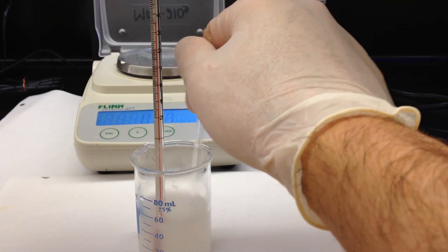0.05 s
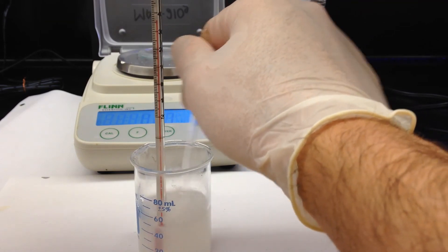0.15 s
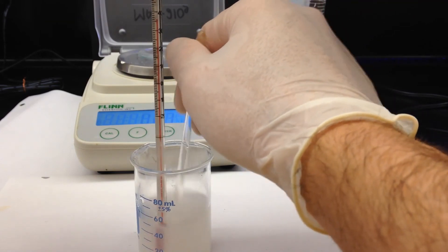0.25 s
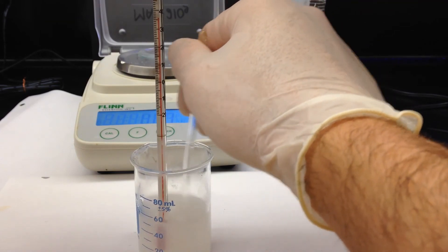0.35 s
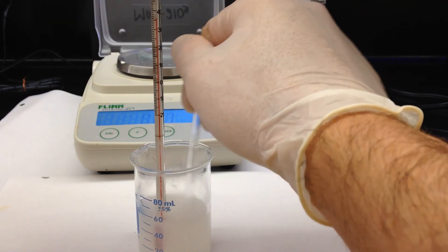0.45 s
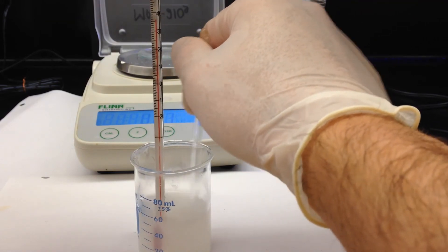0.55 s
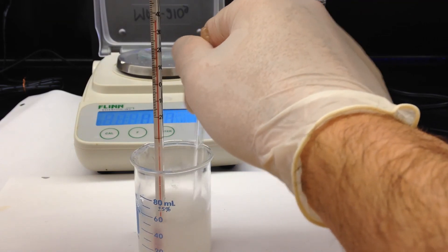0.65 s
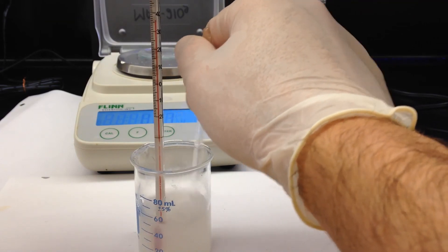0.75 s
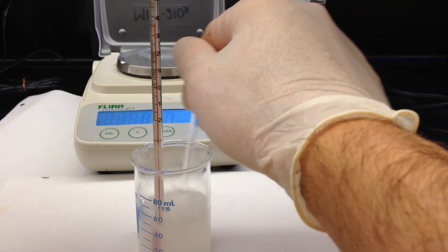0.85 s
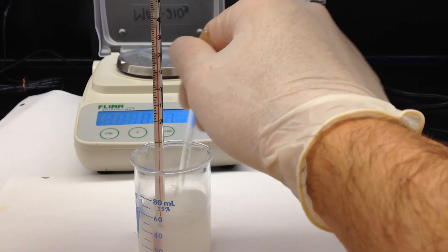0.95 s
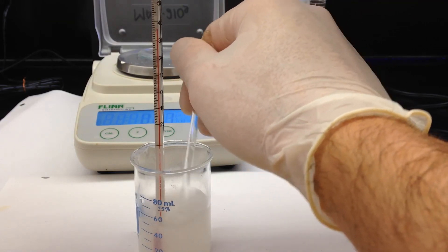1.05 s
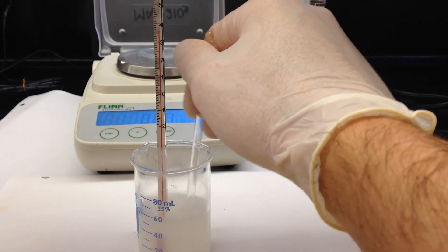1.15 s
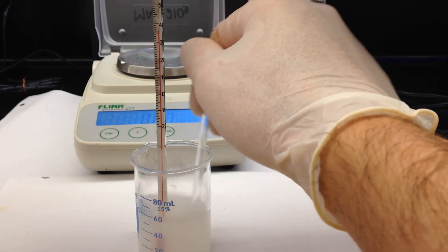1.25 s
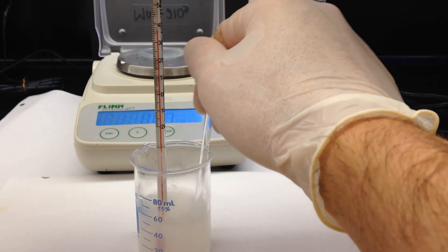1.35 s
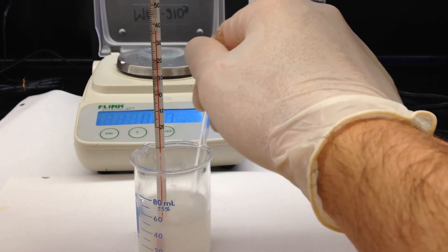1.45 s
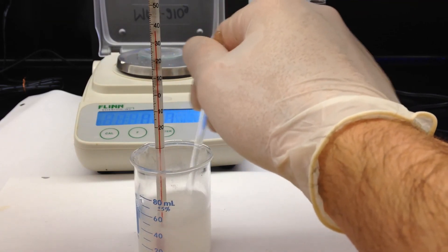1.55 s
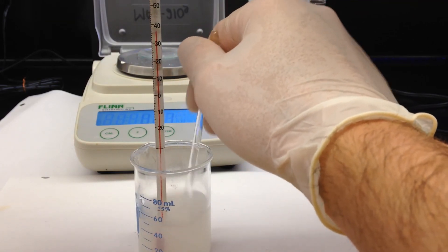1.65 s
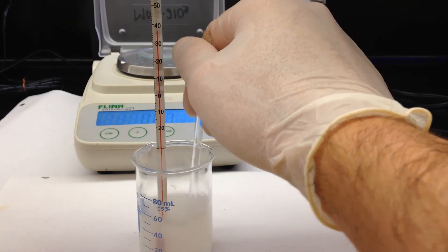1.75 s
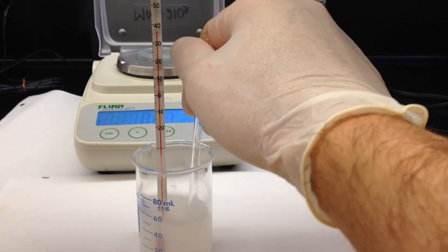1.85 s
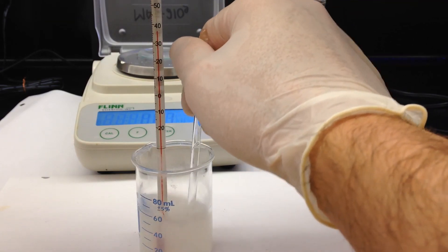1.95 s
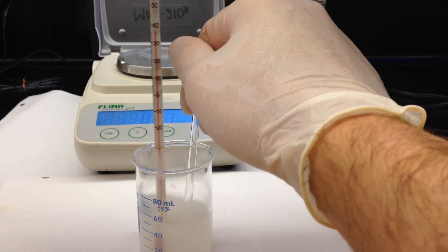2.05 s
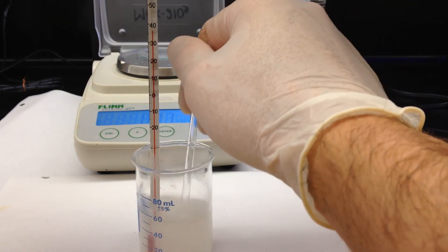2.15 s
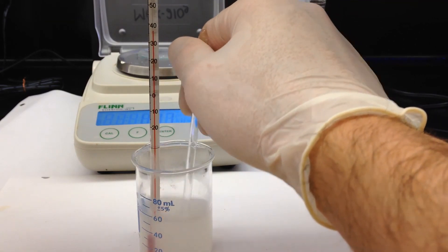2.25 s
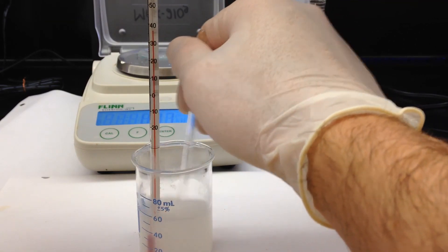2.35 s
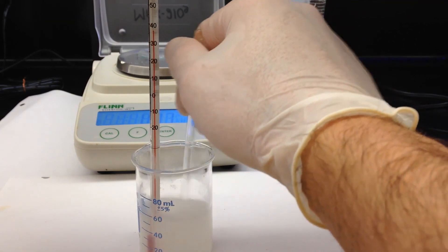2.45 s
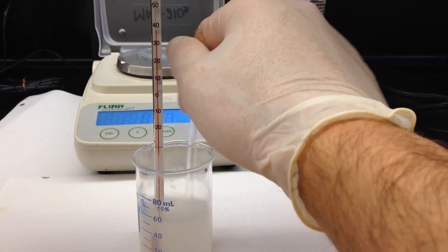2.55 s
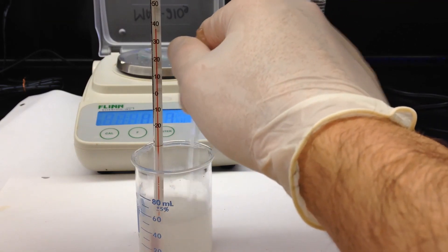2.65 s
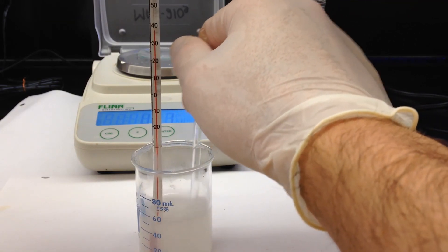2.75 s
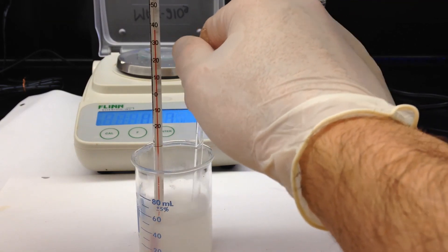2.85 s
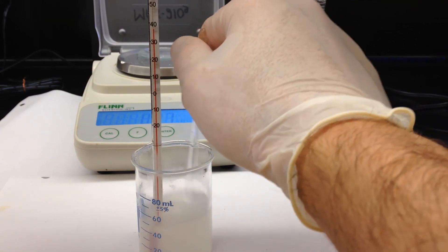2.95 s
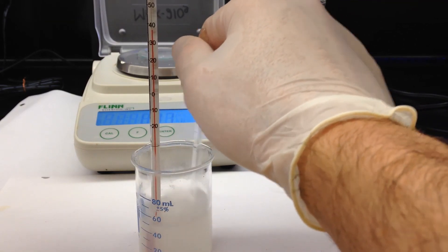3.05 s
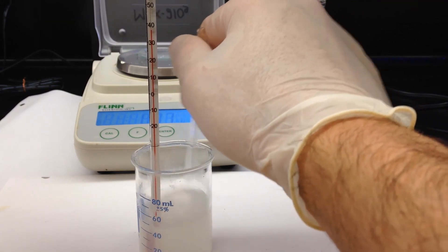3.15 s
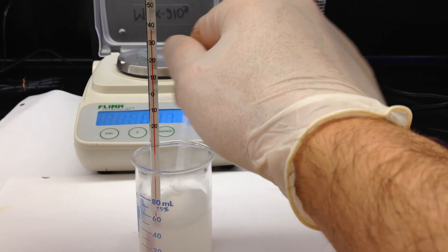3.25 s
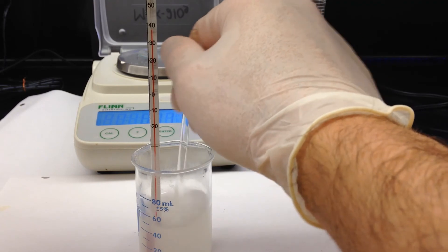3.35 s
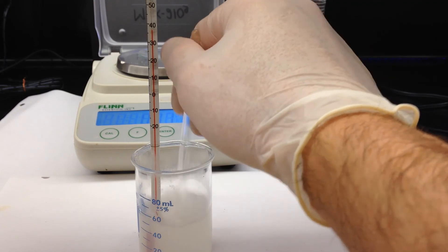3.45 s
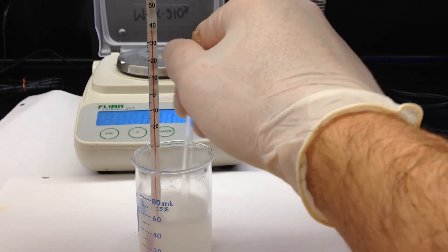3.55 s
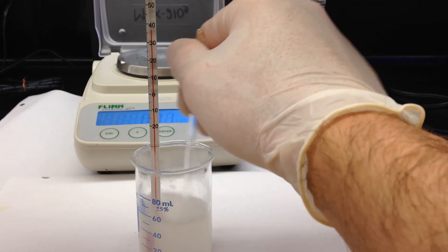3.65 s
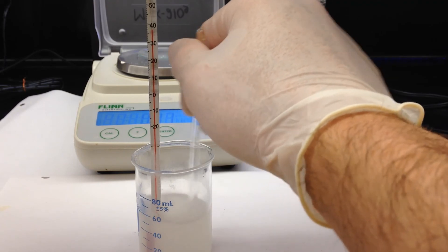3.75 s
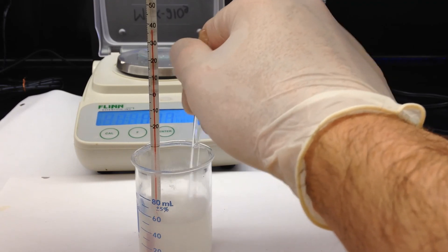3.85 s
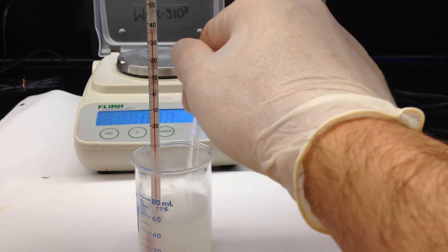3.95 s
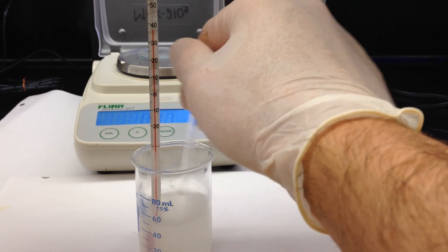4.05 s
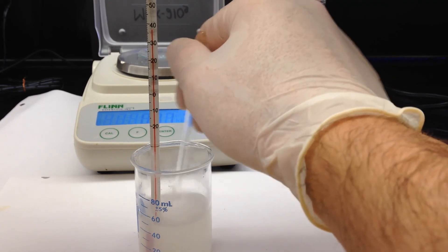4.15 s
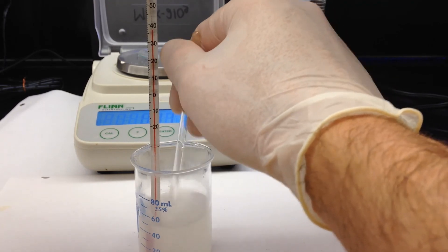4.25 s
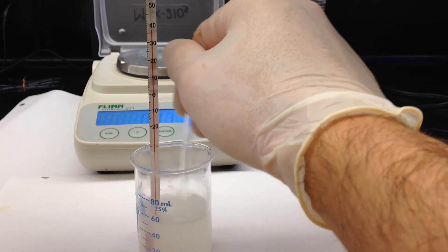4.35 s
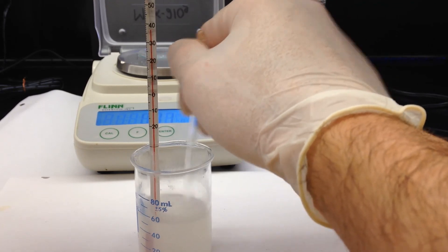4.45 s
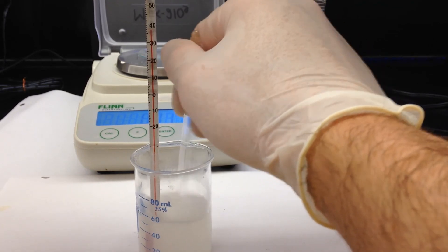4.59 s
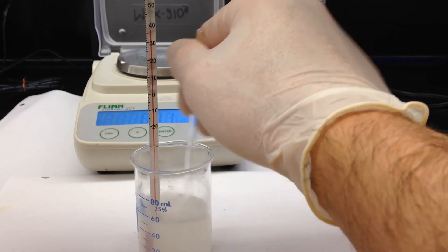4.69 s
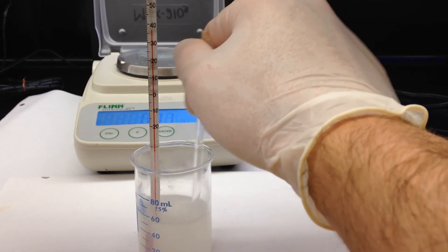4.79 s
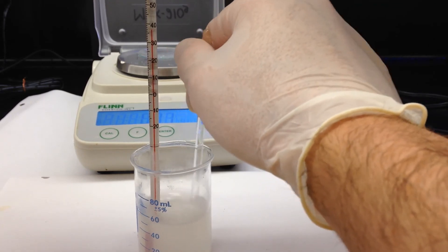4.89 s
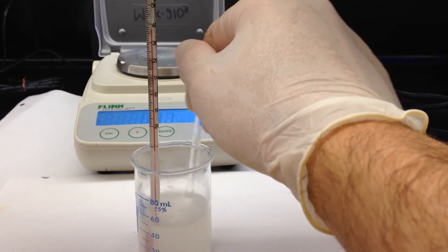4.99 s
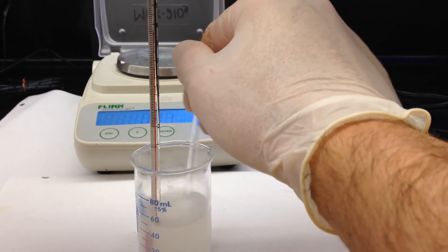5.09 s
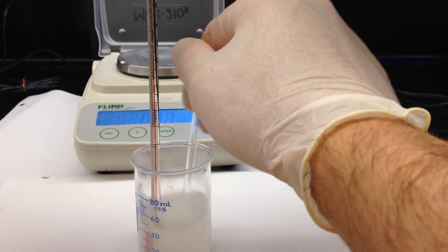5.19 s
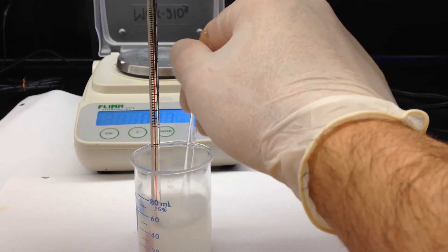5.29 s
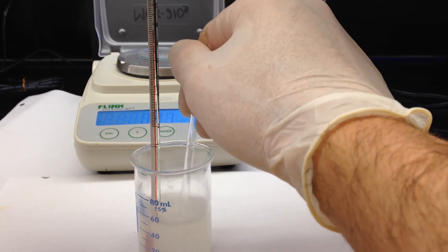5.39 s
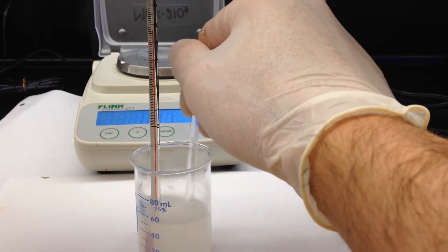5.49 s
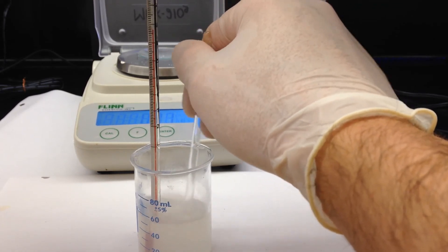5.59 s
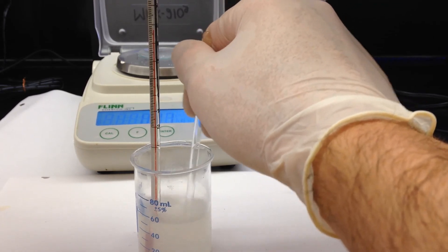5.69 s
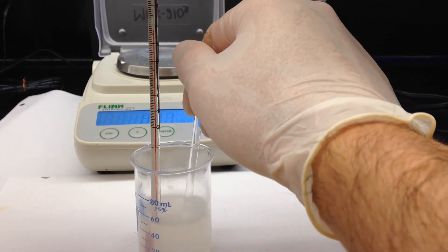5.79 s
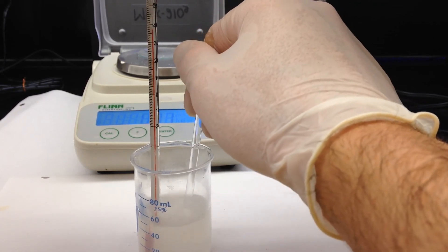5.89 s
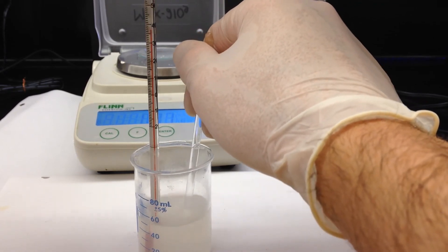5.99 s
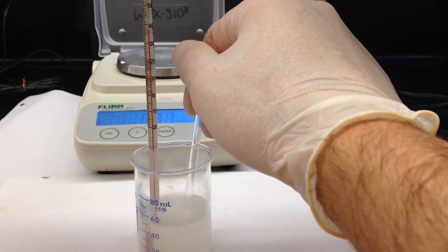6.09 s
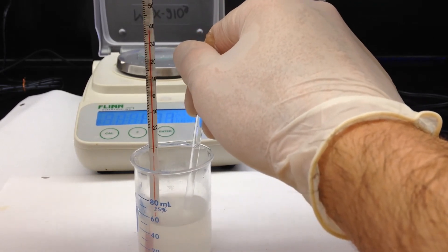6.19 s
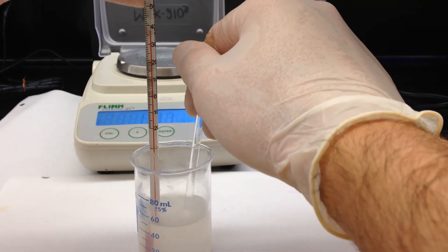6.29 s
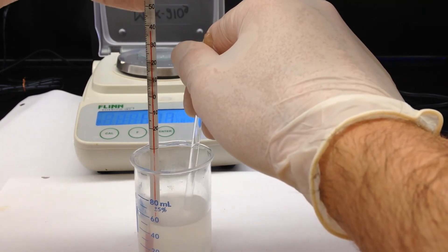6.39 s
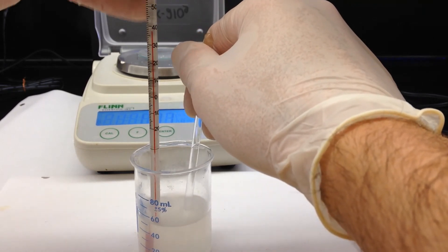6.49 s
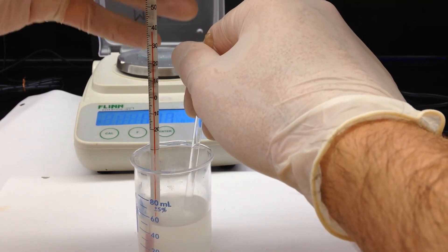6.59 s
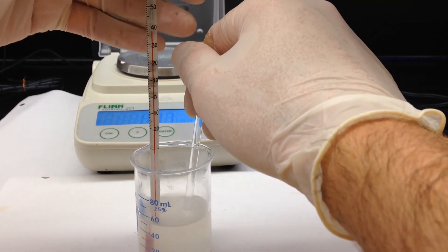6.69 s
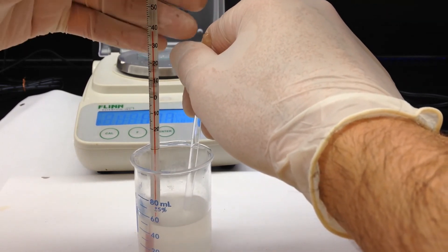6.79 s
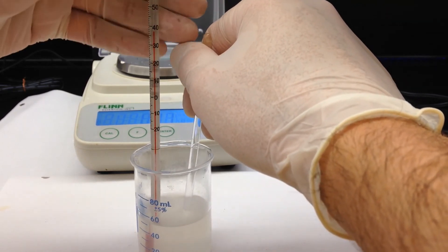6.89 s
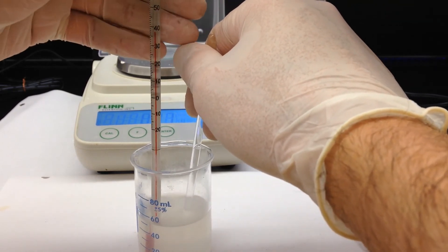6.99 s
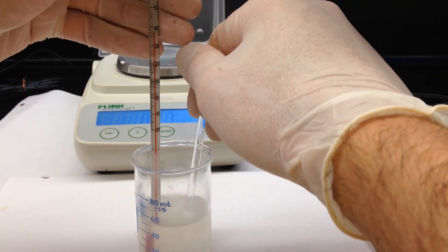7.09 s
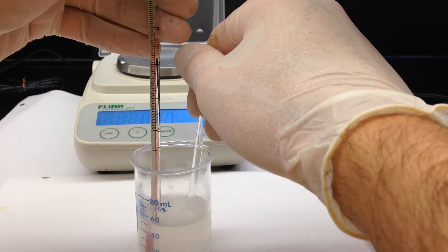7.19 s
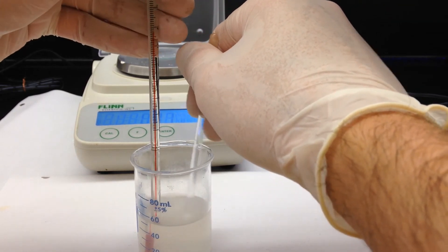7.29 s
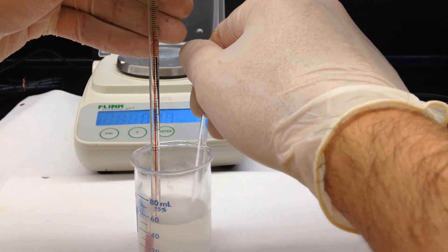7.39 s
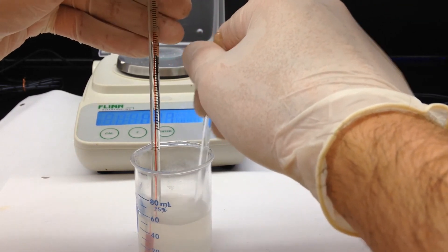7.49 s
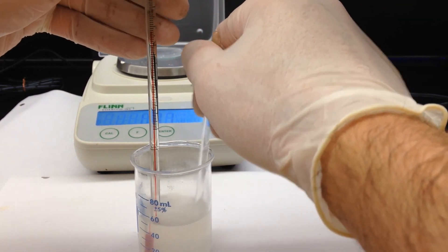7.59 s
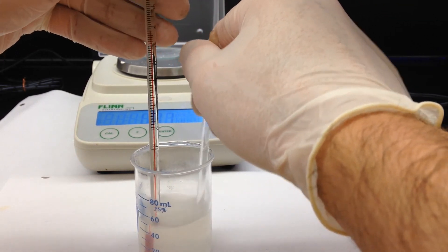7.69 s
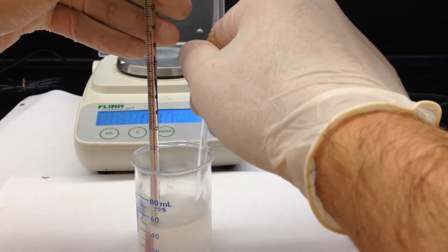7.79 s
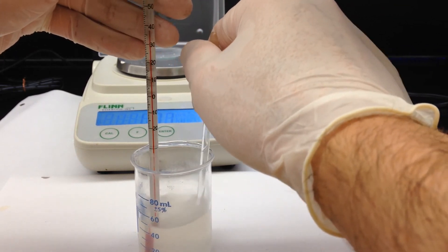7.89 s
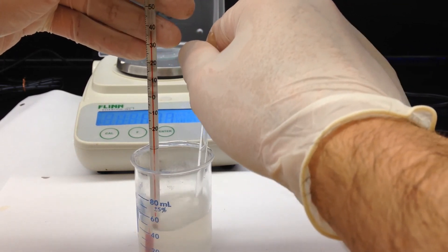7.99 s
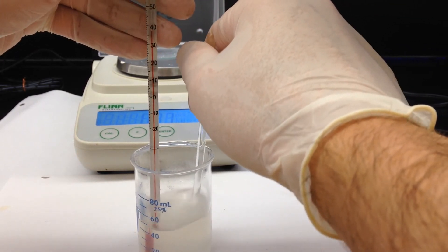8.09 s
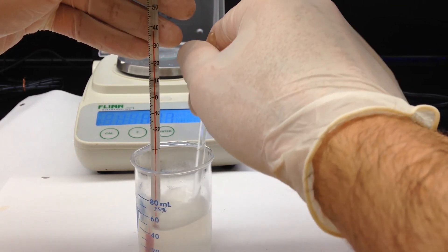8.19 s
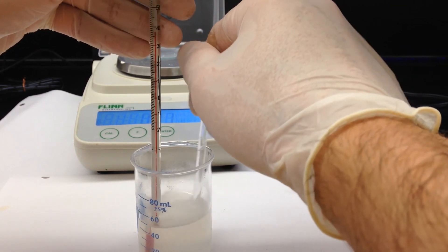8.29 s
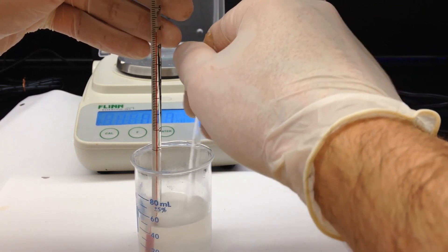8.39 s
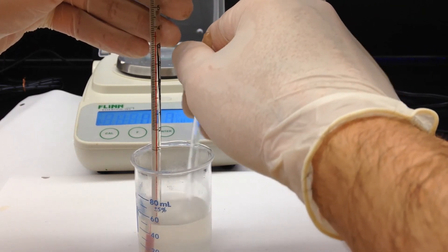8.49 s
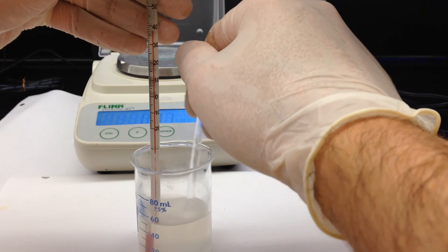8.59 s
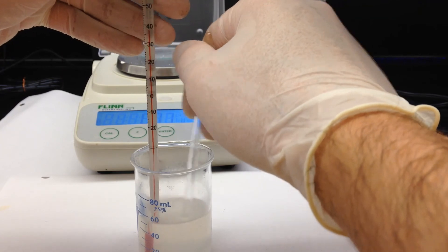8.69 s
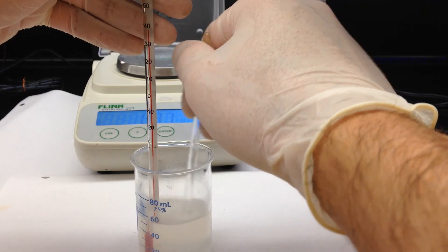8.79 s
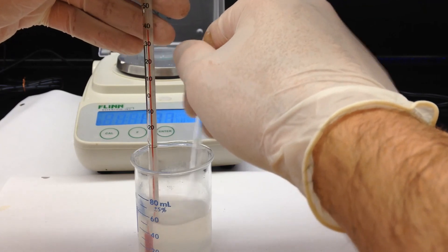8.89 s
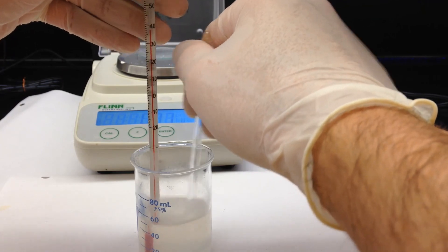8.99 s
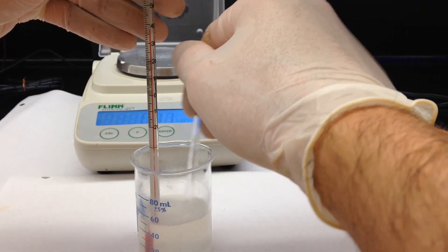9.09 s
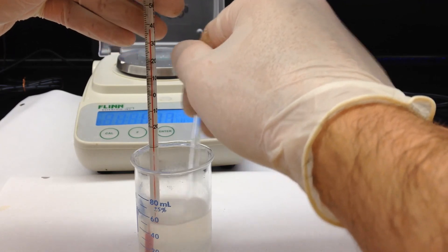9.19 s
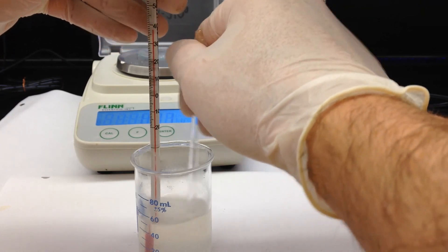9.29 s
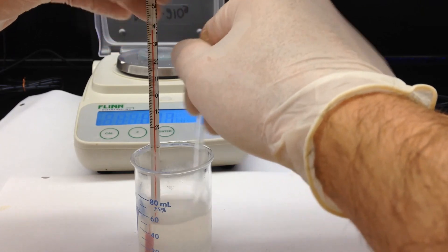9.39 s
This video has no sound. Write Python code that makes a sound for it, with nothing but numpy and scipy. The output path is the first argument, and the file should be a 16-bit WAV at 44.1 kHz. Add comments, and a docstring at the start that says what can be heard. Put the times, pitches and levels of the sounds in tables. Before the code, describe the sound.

Close, light clinks and ticks of glass on glass come about ten a second as a rod circles in a beaker holding a thermometer, mixed with occasional short, high squeaks. The clinks stop briefly while a gloved hand rustles faintly, then start again more evenly, with a slight scuff of the beaker on the bench. A low, steady rush of ventilation fills the quiet lab.

```python
"""A glass rod stirs liquid in a small beaker, close by, clinking on the wall and on a thermometer in it.
About ten contacts a second ring the rod, the thermometer and the wall, each with a bright tick on top.
Now and then the wet glass sticks and slips in a squeak, or the rod's tip catches with a snap.
The clinks pause while a second, gloved hand steadies the thermometer, then return a little lower and
more regular. Underneath runs the ventilation of the lab."""
import sys
import numpy as np
from scipy import signal
from scipy.fft import rfft, irfft
from scipy.io import wavfile

SR = 44100
rng = np.random.default_rng(int(sys.argv[2]) if len(sys.argv) > 2 else 0)


def generate_wav(sig):
    """Save sig (samples, or channels by samples) to the path in sys.argv[1] as 16-bit PCM at SR."""
    pcm = np.round(np.clip(np.atleast_2d(sig).T, -1, 1) * 32767).astype(np.int16)
    wavfile.write(sys.argv[1], SR, pcm)


N = 416304
AGE = np.arange(int(.11 * SR)) / SR   # seconds since the onset of a hit
HELD_FROM_S = 7   # the thermometer stands free until then


def from_db(db):
    """Decibels to gain."""
    return 10 ** (np.asarray(db) / 20)


def rms_one(x):
    """Scale to an rms of 1."""
    return x / np.sqrt(np.mean(x ** 2) + 1e-20)


def at_level(x, db):
    """Give a short sound the energy of 10 ms at this rms level."""
    return from_db(db) * x * np.sqrt(SR / 100 / (np.sum(x ** 2) + 1e-20))


def add(out, s, x):
    """Mix x into out from time s on."""
    start = int(np.clip(round(s * SR), 0, N - 1))
    out[start:start + len(x)] += x[:N - start]


def band(x, low_hz, high_hz):
    """Causal band-pass."""
    return signal.sosfilt(signal.butter(2, [low_hz, min(high_hz, .45 * SR)], "band", fs=SR, output="sos"), x)


def burst(t60):
    """White noise with an instant attack, falling 60 dB in t60 seconds."""
    return rng.standard_normal(len(AGE)) * from_db(-60 * AGE / t60)


def swell(rise_s):
    """A soft attack: the ringing of the glass takes a moment to build."""
    return 1 - np.exp(-(AGE / rise_s) ** 2)


def strike(hz, db, t60, scatter_db, detune):
    """Damped sines; each point of contact gives the modes other strengths and slightly other pitches."""
    strength, shift = rng.standard_normal((2, len(hz)))
    age = AGE[:, None]
    decay = from_db(db + scatter_db * strength - 60 * age / t60)
    partials = decay * np.sin(2 * np.pi * hz * (1 + detune * shift) * age)
    polarity = (-1.0) ** np.arange(len(hz))
    return partials @ polarity


def chatter(ringing, t60):
    """Glass does not strike once: a first touch and a spray of tiny ones all ring the same modes."""
    spray = rng.standard_normal(len(AGE)) ** 3 * from_db(-60 * AGE / t60)
    first_touch = np.linalg.norm(spray) * (AGE == 0)
    return signal.fftconvolve(ringing, first_touch + spray)[:len(AGE)]


# EQ curve of the rushing air: f/Hz, relative level/dB
AIR_CURVE = [(20, -54), (43, -16), (76, -22.5), (97, -6.5), (223, -6), (677, -14), (1560, -24),
             (2200, -27.5), (2400, -30.5), (5500, -33), (10000, -36.5), (16000, -38.5)]
# hum of the fan motor: f/Hz, rms level/dB, width/Hz
FAN_TONES = [(56.1, -80, 4.7), (113, -69.5, 19), (157.7, -72, 4.4), (231.6, -69, 13.7), (407, -67, 102),
             (466, -74, 3.9)]

def ventilation(air_db=-60):
    """The bed: a steady rush of air with the wavering tones of its fan."""
    hz = np.maximum(np.arange(N // 2 + 1) * SR / N, 1)
    curve_hz, curve_db = np.transpose(AIR_CURVE)
    colour = from_db(np.interp(np.log(hz), np.log(curve_hz), curve_db))
    air = irfft(rfft(rng.standard_normal(N)) * colour, N)
    out = from_db(air_db) * rms_one(air)
    turbulence = rfft(rng.standard_normal(N))
    for tone_hz, db, width in FAN_TONES:
        resonance = 1 / (1 + (2 * (hz - tone_hz) / width) ** 2)
        out += from_db(db) * rms_one(irfft(turbulence * resonance, N))
    return out


def lab_reverb(x):
    """Quick scatter from the bench and nearby walls, then the faint tail of the room."""
    t = np.arange(SR // 2) / SR

    def reflections(db, t60, predelay_s):
        tail = rng.standard_normal(len(t)) * from_db(-60 * t / t60)
        echoes = band(tail * (t > predelay_s), 447, 11700)
        return from_db(db) * echoes / np.sqrt(np.sum(echoes ** 2))

    near = reflections(db=-15, t60=.031, predelay_s=.004)
    room = reflections(db=-23.5, t60=.27, predelay_s=.016)
    return signal.fftconvolve(x, near + room)[:N]


# swells of glove noise: centre t/s, level/dB, half-length/s
GLOVE_RUSTLES = [(5.98, -74, 0.17), (6.314, -68, 0.043), (6.56, -65, 0.0093)]

def glove():
    """Faint, grainy rustles as the second hand moves in."""
    t = np.arange(N) / SR
    envelope = sum(from_db(db) * np.exp(-((t - s) / half_s) ** 2) for s, db, half_s in GLOVE_RUSTLES)
    grains = rng.laplace(size=N) * rng.normal(size=N)
    return envelope * rms_one(band(grains, 1500, 16000))


# scuffs of the beaker's foot: t/s, level/dB
BEAKER_NUDGES = [(7.447, -54), (7.53, -49), (7.76, -52.5)]

def nudges():
    """The beaker shifts on the bench with a dull scuff as the clinks return."""
    out = np.zeros(N)
    scuff = band(burst(t60=.05), 550, 1100)
    for s, db in BEAKER_NUDGES:
        add(out, s, at_level(scuff, db))
    return out


# accents from the rod's tip: t/s, level/dB
TIP_SNAPS = [(0.03, -47.5), (0.149, -49), (0.273, -47), (0.318, -38), (1.334, -53), (1.654, -44),
             (1.759, -42.5), (4.325, -32.5), (7.529, -45)]

def snaps():
    """The edge of the rod's tip catches and lets go: a very bright, brittle snap."""
    out = np.zeros(N)
    for s, db in TIP_SNAPS:
        add(out, s, at_level(band(burst(t60=.011), 9000, 16000), db))
    return out


# chirps of wet glass: t/s, f/Hz, level/dB, hold/s
WET_SQUEAKS = [(1.333, 5370, -38.5, 0.0058), (1.434, 5050, -42, 0.018), (1.676, 4746, -27.5, 0.0068),
               (2.835, 5070, -39.5, 0.0057), (3.819, 5130, -45, 0.0079), (3.958, 5400, -34, .011),
               (4.057, 4930, -38, 0.003), (4.167, 4990, -30.5, 0.015), (4.3, 5130, -45, 0.0087),
               (4.415, 5190, -33, 0.0072), (4.878, 5220, -33, 0.0055), (5.77, 4840, -54, 0.0081),
               (8.282, 5100, -48, .004), (8.861, 5110, -41, .004), (9.171, 5050, -42, 0.0051),
               (9.268, 5030, -38, 0.0093)]

def squeaks(slide=.034, waver=.016, rough_db=2.5, settle_s=.0034, release_s=.0023):
    """Stick-slip grabs the rod, slides onto its mode, holds unevenly for milliseconds and lets go."""
    out = np.zeros(N)
    for s, hz, db, hold_s in WET_SQUEAKS:
        pressure, slip = rms_one(band(rng.standard_normal((2, len(AGE))), 40, 300))
        bend = slide * rng.normal() * np.exp(-AGE / settle_s)
        pitch = hz * (1 + waver * slip + bend)
        phase = 2 * np.pi * np.cumsum(pitch) / SR
        tone = np.sin(phase) + from_db(-7) * np.sin(2 * phase) + from_db(-24.5) * np.sin(3 * phase)
        envelope = swell(rise_s=.0015) * np.exp(-np.maximum(AGE - hold_s, 0) / release_s)
        add(out, s, from_db(db + rough_db * pressure) * tone * envelope)
    return out


# modes of the beaker's foot on the bench: f/Hz, relative level/dB
FOOT_MODES = [(630, 2.5), (850, 9), (1300, 9), (1550, 3), (2100, 0), (2600, 8.5)]

def bench_knock():
    """The body under a clink: the beaker's foot chatters on the bench."""
    hz, db = np.transpose(FOOT_MODES)
    return chatter(strike(hz, db, t60=.014, scatter_db=2, detune=.015), t60=.05)


def wall_ring(held):
    """The thin ring of the beaker wall: its twin modes beat, and the rattling rod roughens them."""
    twins_hz = np.array([4494, 4634 if held else 4607])
    twins_db = np.array([-10.5, 0])
    return chatter(strike(twins_hz, twins_db, t60=.1, scatter_db=7, detune=.0022), t60=.031)


# high modes of the glass: f/Hz, relative level/dB with the thermometer free, level/dB with it held
TICK_MODES = [(5440, -15, 8), (6530, 8.5, 7), (7350, 9, 4.5), (8180, 10, 7.5), (8890, 11.5, 11.5),
              (9210, 11, 10.5), (10360, 3, -3), (11380, -1, -5), (14750, -12, -13)]

def glass_tick(tilt_db_per_octave, held):
    """The transient: high modes that die at once; a sharp edge is bright, a wet touch dull."""
    hz, free_db, held_db = np.transpose(TICK_MODES)
    tilt_db = tilt_db_per_octave * np.log2(np.clip(hz, 7500, 11750) / 7500)
    db = (held_db if held else free_db) + tilt_db
    return chatter(strike(hz, db, t60=.0023, scatter_db=2, detune=.008), t60=.01)


def stick_note(modes, hz, t60, scatter_db, detune):
    """A thin glass stick, damped by the liquid and the hand, radiates a short note in the treble only."""
    ratios, db = np.transpose(modes)
    ringing = strike(hz * ratios, db, t60, scatter_db, detune)
    return band(ringing * swell(rise_s=.0003), 1500, 16000)


# partials of the rod: pitch ratio, relative level/dB
ROD_PARTIALS = [(1, -8), (1.15, -10.5)]

def rod_note(hz):
    """The rod's own damped ring, with a new pitch and colour on every hit."""
    return stick_note(ROD_PARTIALS, hz, t60=.018, scatter_db=10, detune=.064)


# partials of the thermometer: pitch ratio, relative level/dB
THERMOMETER_PARTIALS = [(0.91, -19), (1, 7.5)]

def thermometer_note(hz):
    """The struck thermometer gives a short ping of nearly constant pitch."""
    return stick_note(THERMOMETER_PARTIALS, hz, t60=.014, scatter_db=7, detune=.008)


def rebound(db):
    """A film of liquid cushions the rod as it falls back: a dull, rattling blip."""
    blip = stick_note(THERMOMETER_PARTIALS, rng.uniform(3350, 4100), t60=.005, scatter_db=2, detune=0)
    return at_level(chatter(blip, t60=.035), db)


# automation of the clink as the hands shift:
# t/s, thermometer f/Hz, rod f/Hz, bench level/dB against the tick, tick tilt/(dB per octave)
GRIP_AUTOMATION = [(0.3, 3500, 3740, -22, -24), (0.8, 3370, 3840, -14, -8), (1.7, 3325, 3970, -13, -16),
                   (2.4, 3285, 3970, -14.5, 2), (3.3, 3396, 4240, -11.5, 11), (4.6, 3390, 4410, -9.5, 8.5),
                   (7.4, 3310, 4370, -8, 13), (8.5, 3284, 4520, -8.5, 11), (9.4, 3280, 4400, -13, 16)]

def clink(s, tick_db, thermometer_db, rod_db, wall_db, middling_db=-48.5):
    """One contact sounds the thermometer, the rod, the beaker wall, the bench and the high tick."""
    times, *lanes = np.transpose(GRIP_AUTOMATION)
    thermometer_hz, rod_hz, bench_db, tilt = [np.interp(s, times, lane) for lane in lanes]
    tilt += thermometer_db - middling_db   # a firmer contact is shorter and so brighter
    held = s > HELD_FROM_S
    return (at_level(thermometer_note(thermometer_hz), thermometer_db)
            + at_level(rod_note(rod_hz), rod_db)
            + at_level(wall_ring(held), wall_db)
            + at_level(bench_knock(), tick_db + bench_db)
            + at_level(glass_tick(tilt, held), tick_db))


# clinks, one or two a turn: t/s, tick level/dB, thermometer level/dB, rod level/dB, wall level/dB
CLINKS = [(0.0533, -41, -31, -56, -48), (0.0774, -49.5, -43, -60, -53), (0.1724, -42, -32.5, -52, -45),
          (0.293, -46.5, -32.5, -44, -51), (0.316, -46, -42, -62, -51), (0.4269, -51.5, -45, -47, -57),
          (0.55, -39.5, -42.5, -45, -58), (0.64, -45, -42, -40.5, -41), (0.7612, -44, -40.5, -56, -50.5),
          (0.8626, -45, -40.5, -41, -41.5), (0.9844, -38, -32.5, -35, -50), (1.114, -53.5, -54, -48.5, -70),
          (1.2156, -46, -40, -41, -48), (1.3342, -48, -45, -37, -59), (1.42, -51, -62, -47, -53),
          (1.6332, -41.5, -44, -53, -51), (1.6532, -46.5, -62, -41, -54), (1.6936, -48, -49, -37.5, -52),
          (1.76, -42.5, -60, -39, -51), (1.8004, -54, -52, -47.5, -63), (1.854, -42.5, -51, -53, -51.5),
          (1.958, -48.5, -50, -58, -56), (2.0142, -50.5, -45, -43.5, -66), (2.07, -41.5, -51, -45.5, -67),
          (2.1646, -41.5, -54, -44, -48), (2.2651, -41, -46, -46, -51.5), (2.3622, -40, -42, -44, -47.5),
          (2.437, -42.5, -57, -48.5, -71), (2.5761, -42.5, -48, -56, -52.5),
          (2.6856, -45.5, -46.5, -54, -52.5), (2.9157, -45.5, -48.5, -57, -51),
          (3.0073, -51.5, -56, -50.5, -59), (3.1741, -42, -44.5, -43.5, -51),
          (3.2773, -45.5, -47, -40, -45), (3.356, -48, -45, -44, -53), (3.3983, -53, -48.5, -50, -53),
          (3.51, -44, -39.5, -41, -48.5), (3.5788, -44, -50, -46.5, -57), (3.6185, -55.5, -52, -48, -55),
          (3.732, -46.5, -43.5, -41.5, -56), (3.9037, -49, -51, -48, -69), (4.2914, -50.5, -51, -43, -45),
          (4.3233, -51, -49, -52, -49), (4.3616, -47, -54, -46, -55), (4.532, -38, -29, -38, -41),
          (4.5918, -45, -34, -49, -44.5), (4.6993, -47, -42.5, -45.5, -55),
          (4.7662, -40.5, -39.5, -37.5, -37.5), (4.8183, -52, -42, -53, -55), (4.9966, -53, -43, -44, -58),
          (5.2186, -51.5, -42.5, -41.5, -53), (5.3951, -43.5, -41.5, -58, -48.5),
          (5.5131, -44, -45.5, -52, -56), (5.7373, -44.5, -55.5, -47, -71), (5.8488, -44, -55, -46, -72),
          (7.529, -44, -47, -38, -48), (7.6392, -41, -38, -59, -47), (7.6607, -47.5, -49.5, -46, -69),
          (7.742, -43, -39, -50, -43), (7.9482, -44, -40, -45, -45), (8.048, -45.5, -38, -53, -44),
          (8.2515, -41.5, -38, -57, -46), (8.3472, -38, -35, -64, -43.5), (8.4284, -44.5, -40.5, -60, -55),
          (8.5285, -39.5, -36.5, -63, -47.5), (8.6284, -40, -36.5, -58, -49),
          (8.9399, -43.5, -42.5, -58, -48.5), (9.0223, -41.5, -39, -53, -55),
          (9.1217, -41.5, -37.5, -66, -55), (9.22, -41.5, -39, -62, -53), (9.3333, -41, -41.5, -60, -47.5)]
# clinks of the rod on the glass, with little wall ring: t/s, tick level/dB, thermometer level/dB
TIGHT_CLINKS = [(0.101, -53.5, -54), (0.196, -59, -38.5), (0.354, -56, -57), (0.469, -56, -61),
                (0.587, -51, -48), (0.6866, -46.5, -59), (0.7928, -45, -52), (0.8842, -59.5, -49),
                (0.9182, -47.5, -47.5), (1.161, -51.5, -58), (1.2815, -45.5, -51.5), (1.361, -67, -50),
                (1.3926, -49.5, -51), (1.4764, -49, -54.5), (1.521, -52, -49.5), (1.749, -52, -54),
                (2.206, -51.5, -45.5), (2.495, -63, -53.5), (2.5234, -47.5, -44.5), (2.748, -56, -59),
                (2.768, -64, -51), (3.1143, -47, -48), (3.419, -51, -56), (3.6747, -45, -47),
                (3.787, -50.5, -47.5), (3.954, -47.5, -43), (4.023, -48.5, -58.5), (4.415, -48, -41),
                (4.477, -64, -50.5), (4.901, -52, -57), (4.9507, -47, -49), (5.051, -46, -43.5),
                (5.13, -57, -57.5), (5.164, -53.5, -53), (5.291, -43.5, -43.5), (5.631, -49.5, -49),
                (7.333, -49.5, -53.5), (7.563, -45.5, -51), (7.853, -43.5, -48), (8.147, -53, -43.5),
                (8.729, -44.5, -43), (8.8238, -46.5, -42), (9.085, -52.5, -51.5)]

def stirring_rod(graze_s=.036, graze_db=-68.5, rebound_chance=.75, rebound_s=.013, rebound_db=-58.5):
    """The circling rod clinks on the glass, often trailing a graze or a rebound."""
    out = np.zeros(N)
    for s, *levels in CLINKS:
        add(out, s, clink(s, *levels))
        lateness, force, rebound_draw, slide = rng.random(4)
        graze = clink(s, *(graze_db + 2.5 * rng.normal(size=4)))
        if s < HELD_FROM_S:   # with the thermometer free, the rod grazes the glass again as it slides on
            add(out, s + graze_s * (1 + slide), graze)
        if rebound_draw < rebound_chance:
            add(out, s + rebound_s * 2 ** lateness, rebound(rebound_db + 4.5 * force))
    for s, tick_db, thermometer_db in TIGHT_CLINKS:
        add(out, s, clink(s, tick_db, thermometer_db, rod_db=thermometer_db - 7, wall_db=tick_db - 12.5))
    return out


def scene():
    """The mono mix: close glass and handling with a touch of room, over the ventilation."""
    close = stirring_rod() + squeaks() + snaps() + glove() + nudges()
    return (close + lab_reverb(close) + ventilation())[None]


def record(dry):
    """A steep high cut at 16.6 kHz."""
    return signal.sosfilt(signal.ellip(10, .1, 80, 16600, fs=SR, output="sos"), dry)


dry = scene()
out = record(dry)
generate_wav(out)
```